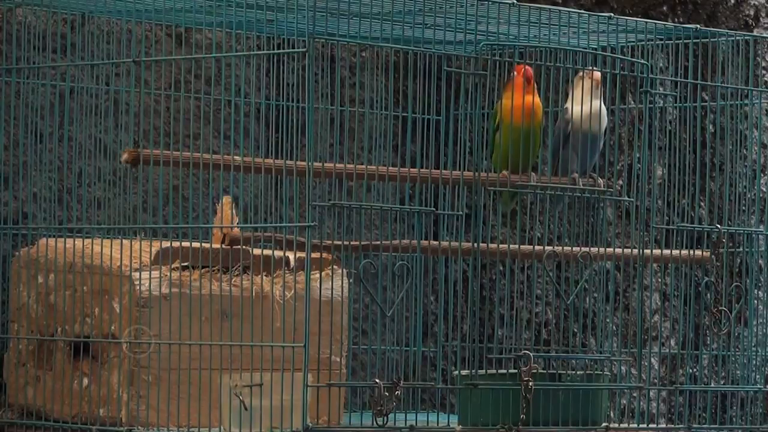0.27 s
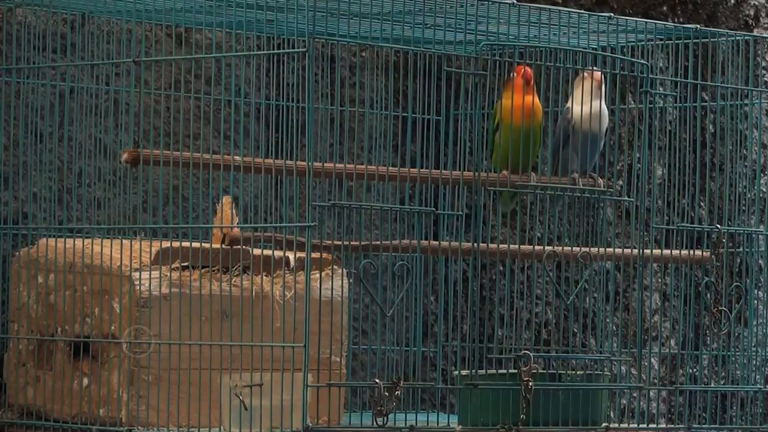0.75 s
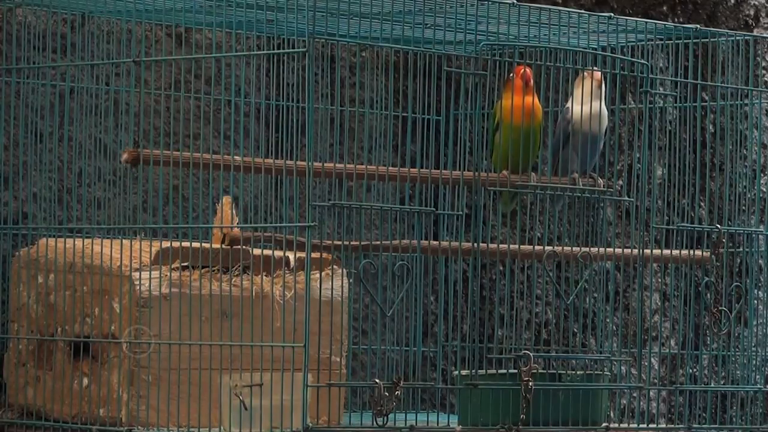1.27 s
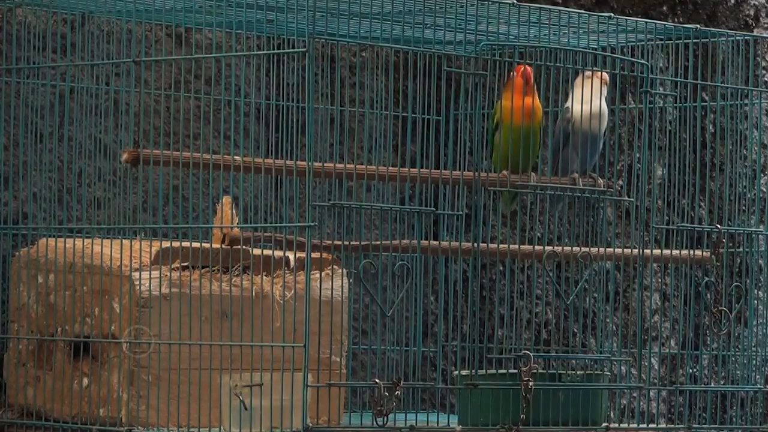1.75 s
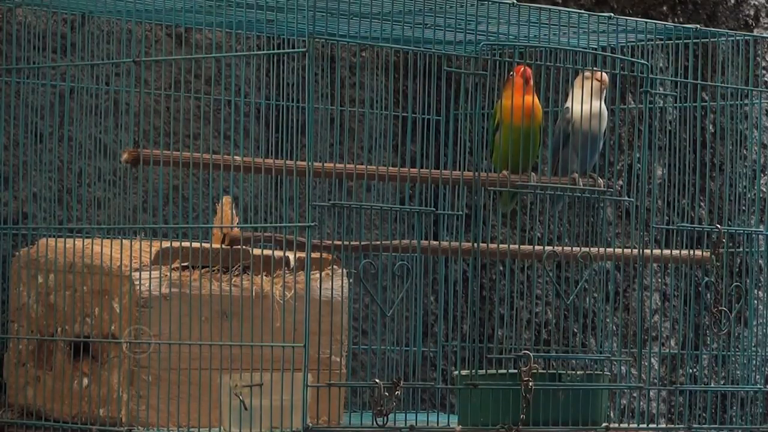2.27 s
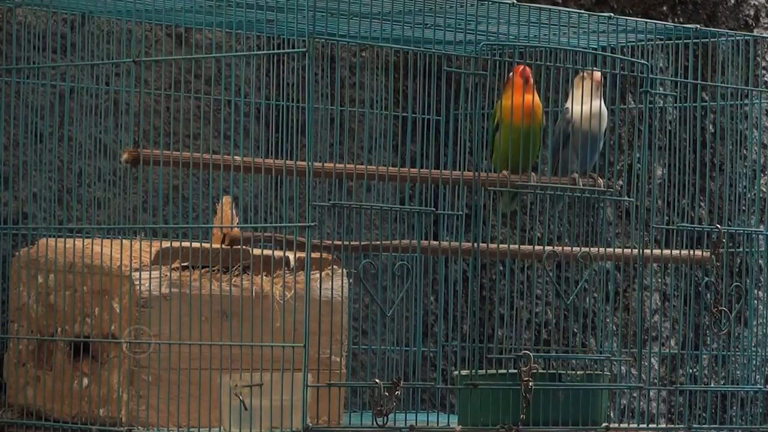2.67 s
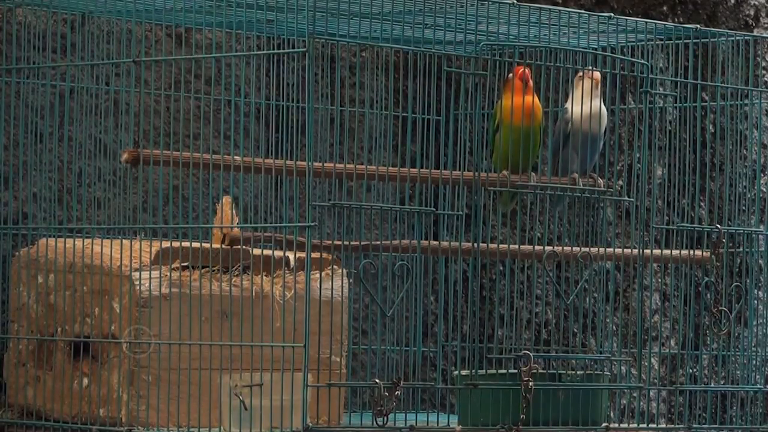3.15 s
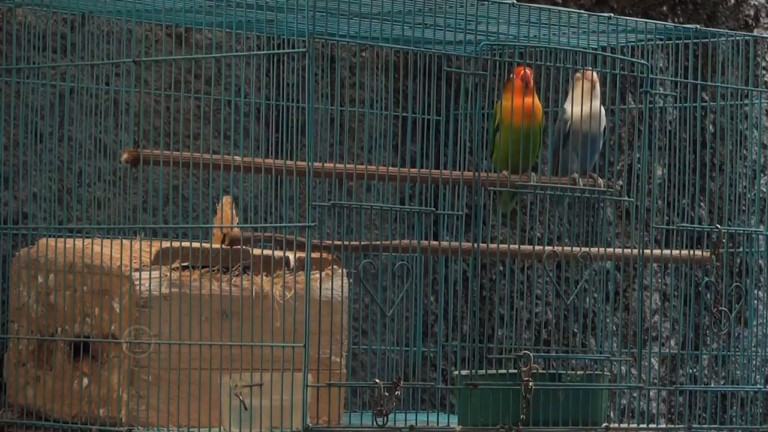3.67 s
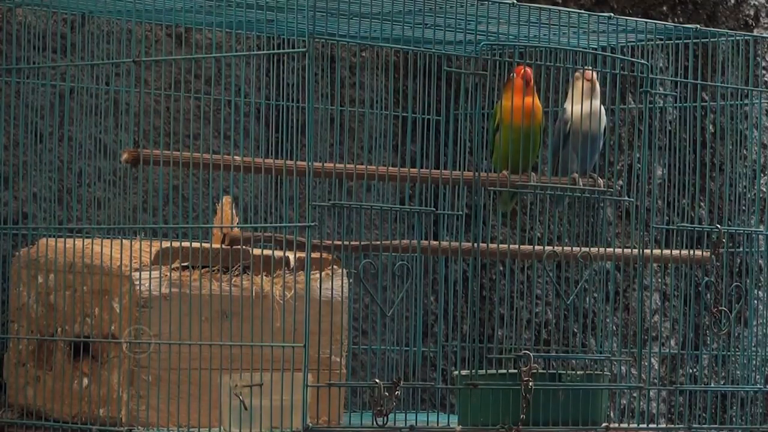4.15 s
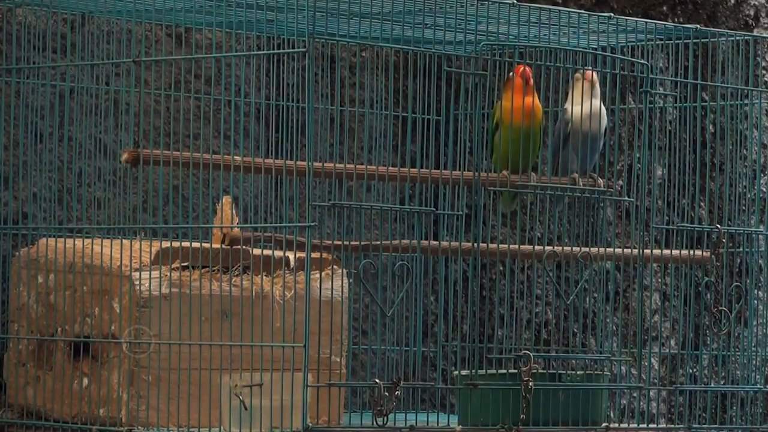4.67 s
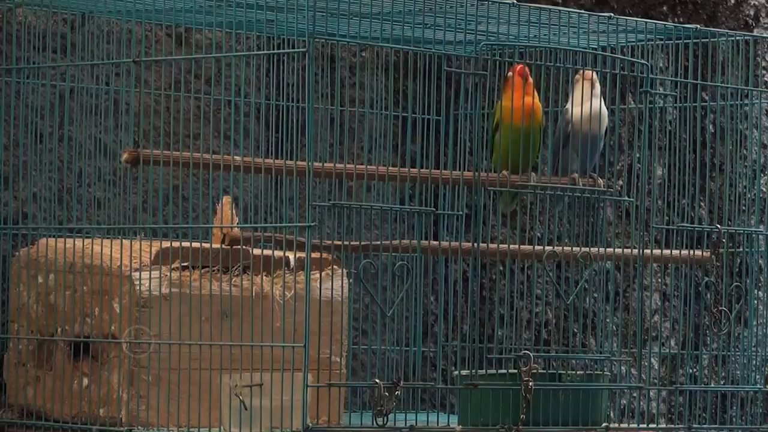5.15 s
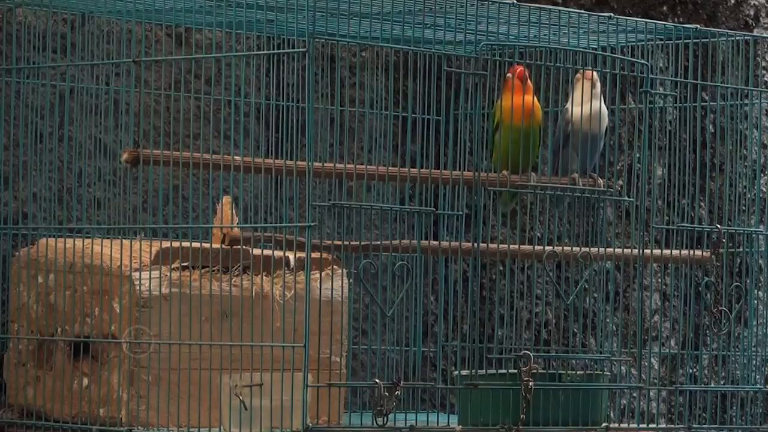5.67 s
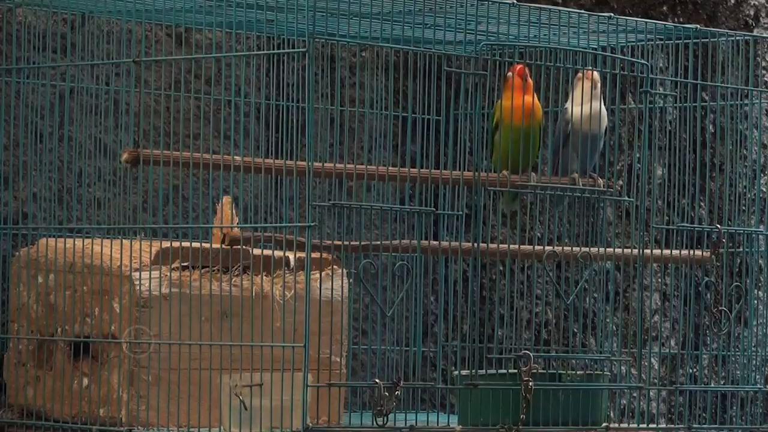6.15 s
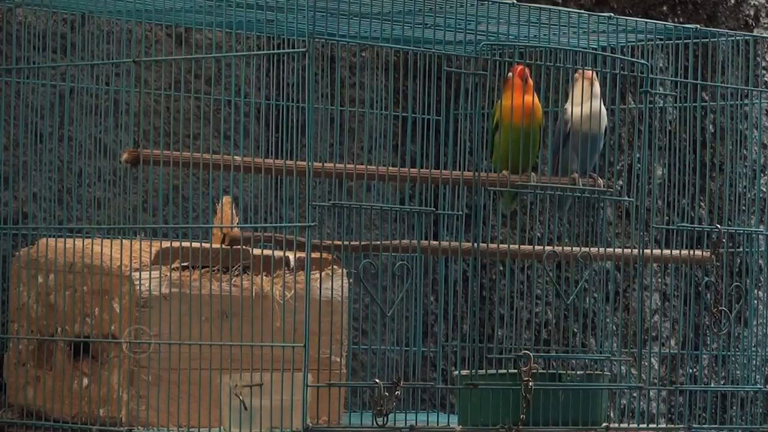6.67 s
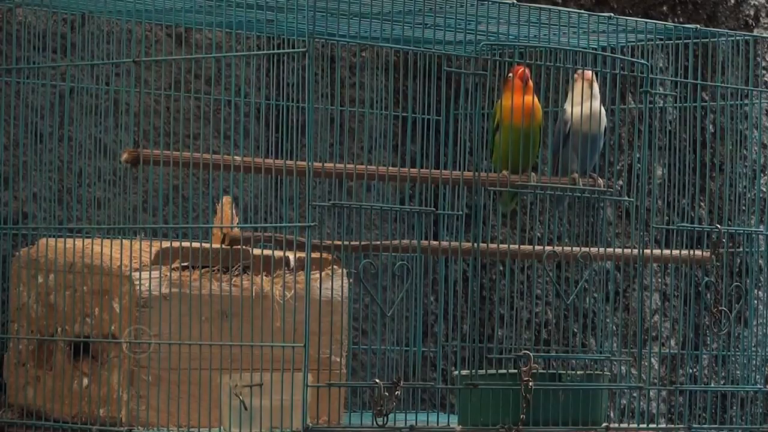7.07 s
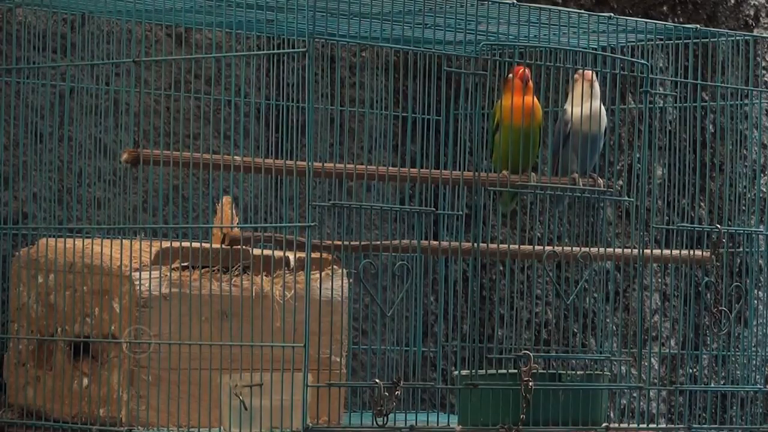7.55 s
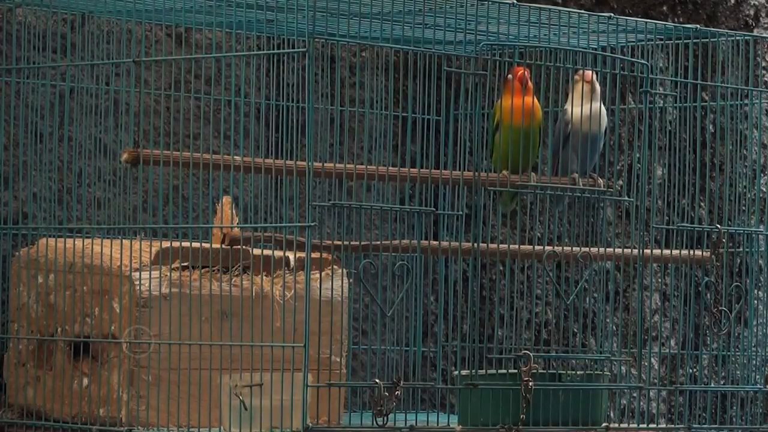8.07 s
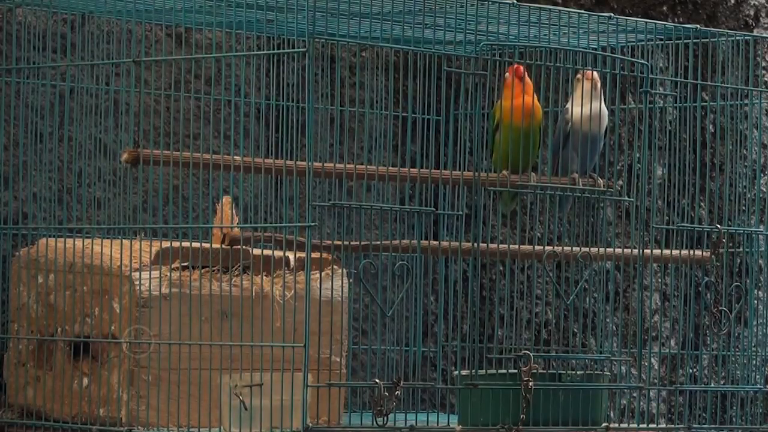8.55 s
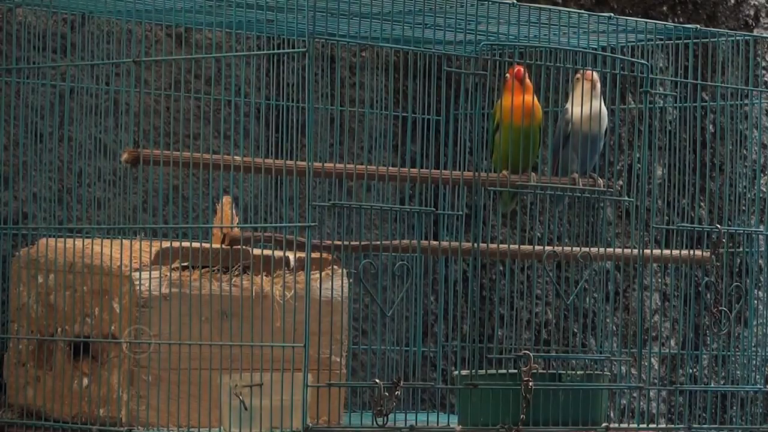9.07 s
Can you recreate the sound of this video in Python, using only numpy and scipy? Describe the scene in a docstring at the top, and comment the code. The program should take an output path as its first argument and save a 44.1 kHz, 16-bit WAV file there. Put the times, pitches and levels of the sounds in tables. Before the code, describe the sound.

Two caged lovebirds chatter in sharp, high, rapid chirp clusters with short pauses, ringing off hard walls over a faint low distant rumble.

```python
"""In a hard-walled room, two caged lovebirds chatter.
Each chirp chains quick syllables: whistled glides, nasal low notes and rasps, built from overtones
that sweep through the resonances of throat and beak, then ring on between the walls.
A distant outdoor rumble, made of shaped noise, lies underneath.
An automatic gain control ducks under the loudest shrieks, and the highest treble is cut off."""
import sys
import numpy as np
from scipy import signal
from scipy.fft import rfft, irfft, next_fast_len
from scipy.io import wavfile
from scipy.ndimage import uniform_filter1d, minimum_filter1d, map_coordinates

SR = 44100
rng = np.random.default_rng(int(sys.argv[2]) if len(sys.argv) > 2 else 0)


def bounce(signal):
    """Save signal as a 16-bit WAV file at the path given by the first command-line argument."""
    frames = np.transpose(np.atleast_2d(signal))
    limited = np.clip(frames, -1, 1)
    pcm = np.round(limited * 32767).astype(np.int16)
    wavfile.write(sys.argv[1], SR, pcm)


N = 411012  # length of the scene in samples

RELEASE_S = 0.00418  # every note fades out over this time


def amp(db):
    """Turn decibels into a gain."""
    return 10 ** (np.asarray(db) / 20)


def unit(x):
    """Scale x to an average strength (rms) of 1."""
    return x / np.sqrt(np.mean(x ** 2) + 1e-20)


def along(points, hz):
    """Read a curve of (f/Hz, value) points at hz, on a logarithmic frequency axis."""
    f, v = np.transpose(points)
    return np.interp(np.log(hz + 1), np.log(f + 1), v)


def over_time(points, t):
    """Read a curve of (position, value) points at t, in straight lines."""
    return np.interp(t, *np.transpose(points))


def wobble(t, rate):
    """Draw a smooth random curve over the times t, with rate random points a second."""
    return map_coordinates(rng.standard_normal(size=512), [t * rate], mode="wrap")


def filtered(x, response):
    """Make each frequency of x louder or softer by the gain response(hz)."""
    n = x.shape[-1]
    m = next_fast_len(n + 8192)  # silence at the end keeps it from wrapping round
    spectrum = rfft(x, m) * response(np.fft.rfftfreq(m, 1 / SR))
    return irfft(spectrum, m)[..., :n]


def clock(length):
    """Count the time within a note, its release included."""
    return np.arange(int((max(length, .004) + RELEASE_S) * SR)) / SR


def lovebirds():
    """Add up both birds' syllables, each at its moment."""
    song = np.zeros(N + SR)
    for start, note in (*peeps(), *nasals(), *chips(), *tweets(), *slurs(), *squawk()):
        song[max(round(start * SR), 0):][:len(note)] += note
    return song[:N]


def tweets():
    """Whistles that scoop up to their pitch from below and keep climbing."""
    # Upward whistles: [t/s, length/s, pitch/Hz, scoop/octaves, level/dB,
    # overtone slope/dB per octave, roughness/0-1]
    tweet_notes = [ (1.235, 0.033, 3600, .2, -19.5, -6.5, 0.39), (1.923, 0.037, 3174, 0.35, -13, -5, 0.18),
                   (2.776, 0.026, 4470, 0.23, -16.5, -5, .22), (2.897, 0.04, 3697, 0.08, -11.5, -3, 0.31),
                   (2.929, 0.052, 4300, 0.053, -14.5, -7, 0.12), (3.604, 0.041, 4650, 0, -24.5, -2, .03),
                   (4.741, .03, 4080, 0.08, -16, -8, 0.34), (4.934, 0.046, 4104, 0.16, -10.5, -7.5, 0.26),
                   (5.072, 0.036, 5110, 0.024, -18.5, -3.5, 0.03),
                   (5.245, 0.019, 5100, 0.59, -9.5, -4, 0.56), (5.754, 0.04, 4250, 0.19, -15.5, -1.5, 0.19),
                   (6.089, .041, 4250, 0.59, -16.5, 0, 0), (6.257, 0.076, 4205, .15, -16, 0, 0.14),
                   (6.463, .036, 4250, 0.51, -17.5, 0.5, 0.05), (6.662, 0.052, 4420, 0.72, -15.5, 1, 0.08),
                   (6.908, 0.037, 4560, 0.11, -14.5, 1.5, 0.28), (6.946, 0.026, 6390, 0.69, -14.5, -4, .25),
                   (8.529, 0.034, 3224, .05, -10, -7, 0.59), (9.304, .014, 4050, 0.46, -14.5, -2, 0.3), ]
    scoop_s, climb_oct_per_s = .007, 2.52
    for start, length, hz, scoop, db, slope_db, rough in tweet_notes:
        note = whistle(length, hz, -scoop, scoop_s, climb_oct_per_s, slope_db, rough)
        yield start, amp(db) * note


def slurs():
    """Whistles that slide in from above their pitch and sink."""
    # Downward whistles: [t/s, length/s, pitch/Hz, level/dB,
    # overtone slope/dB per octave, roughness/0-1]
    slur_notes = [ (0.531, 0.0216, 3860, -19.5, -1.5, 0.32), (0.646, 0.03, 3360, -24.5, -4.5, 0.57),
                  (1.195, 0.042, 3317, -17.5, -24, 0.42), (1.617, 0.012, 2784, -15, -22, 0.02),
                  (1.662, 0.024, 3540, -12, -3, 0.1), (1.69, 0.055, 4000, -17.5, -9.5, 0.13),
                  (1.962, 0.035, 3058, -15.5, -4.5, 0.37), (2.724, 0.036, 3134, -19, -24, 0.4),
                  (3.052, 0.028, 3846, -16, -3, 0.31), (3.414, 0.034, 3206, -23, -4.5, 0.4),
                  (3.554, 0.032, 3823, -19, -10, 0), (4.693, 0.043, 3160, -19.5, -6, 0.42),
                  (4.916, 0.015, 4420, -12, -21, 0.53), (5.05, 0.0094, 6040, -18, 1, 0.1),
                  (6.584, 0.024, 3670, -16, -9, 0.67), (6.889, 0.017, 6040, -23.5, -10, 0.1),
                  (7.733, 0.022, 3680, -16, -16, 0), (8.559, 0.0417, 3255, -15.5, -4.5, 0.23), ]
    slide_oct, slide_s, sink_oct_per_s = 0.192, 0.00496, 1.15
    for start, length, hz, db, slope_db, rough in slur_notes:
        note = whistle(length, hz, slide_oct, slide_s, -sink_oct_per_s, slope_db, rough)
        yield start, amp(db) * note


def whistle(length, hz, miss_oct, settle_s, drift_oct_per_s, slope_db, rough):
    """The pitch starts off its mark, settles quickly and drifts steadily."""
    off_pitch_db_per_oct = -12.5  # a whistle is weak until it finds its pitch
    t = clock(length)
    miss = miss_oct * np.exp(-t / settle_s)
    pitch = hz * 2 ** (miss + drift_oct_per_s * (t - length / 2))
    strength = amp(off_pitch_db_per_oct * np.abs(miss))
    return strength * syllable(t, pitch, slope_db, rough)


def chips():
    """The voice leaps out of a low grunt to a peak, then falls ever faster, growing rough and faint."""
    # Chips, timed by their leap: [t/s, grunt/s, tumble/s, low pitch/Hz, peak pitch/Hz, level/dB]
    chip_notes = [ (.102, 0.00041, 0, 2000, 2760, -18), (.289, 0, 0.019, 2640, 3560, -23.5),
                  (1.185, .009, 0.0075, 2096, 4130, -18.5), (1.245, 0, 0.012, 3410, 4220, -21.5),
                  (1.904, 0.0038, 0.0095, 2840, 3810, -15), (2.673, .005, 0.049, 2575, 4996, -15.5),
                  (2.871, 0, 0, 2360, 3400, -12.5), (3.04, 0.0016, 0, 1800, 2500, -23),
                  (3.088, 0.0094, 0.015, 3056, 4645, -15.5), (3.58, 0.0026, 0.04, 2796, 4470, -14),
                  (4.031, 0, .024, 4280, 4800, -16), (4.69, 0.002, 0.011, 2950, 4300, -19),
                  (4.813, 0.00097, 0.0098, 3380, 4570, -15), (5.056, 0, .016, 2904, 5120, -15),
                  (5.197, 0, 0, 3440, 4890, -12.5), (5.449, .01, 0.034, 2165, 4970, -15),
                  (5.608, 0.015, 0.054, 1862, 4130, -17), (5.752, .006, 0.0013, 2200, 3750, -21.5),
                  (6.221, 0.0027, .014, 2430, 6040, -15), (6.562, 0.0023, 0.0072, 1954, 4720, -15.5),
                  (6.705, 0, 0.029, 4220, 4510, -21), (6.732, 0.0044, 0.0026, 2570, 3390, -14),
                  (7.702, 0.0078, 0.028, 2382, 4494, -21), (7.748, 0, 0.026, 3506, 4270, -21.5),
                  (8.43, 0.0041, .016, 2840, 4900, -11), ]
    grunt_db, leap_s = -5.5, .008
    tumble_oct, tumble_curve, tumble_db = 1.1, 2.6, -8
    # Tone at the low start, the peak and the end of the tumble.
    stage_rough = [0.41, 0.423, 0.94]  # 0-1
    stage_slope = [-2.5, -2, -6.5]  # dB per octave
    for leap, grunt, tumble, low_hz, peak_hz, db in chip_notes:
        t = clock(grunt + leap_s + tumble)
        up = np.clip((t - grunt) / leap_s, 0, 1)
        down = np.clip((t - grunt - leap_s) / (tumble + RELEASE_S), 0, 1) ** tumble_curve
        pitch = low_hz * (peak_hz / low_hz) ** up * 2 ** (-tumble_oct * down)
        slope_db = np.interp(up + down, np.arange(3), stage_slope)
        rough = np.interp(up + down, np.arange(3), stage_rough)
        level_db = db + grunt_db * (t < grunt) + tumble_db * down
        yield leap - grunt, amp(level_db) * syllable(t, pitch, slope_db, rough)


def nasals():
    """An even glide in the low register, rich in overtones and mostly brighter when louder."""
    # Nasal notes: [t/s, length/s, middle pitch/Hz, glide/octaves, level/dB, roughness/0-1]
    nasal_notes = [ (0.519, 0.031, 2063, -0.59, -23, 0.48), (1.195, 0.027, 1982, -.45, -24, 0.52),
                   (1.596, 0.024, 2850, 0.034, -27, 0.2), (1.626, 0.031, 2706, 0.22, -18.5, 0.77),
                   (1.768, 0.022, 2293, -0.1, -17.5, 0.21), (1.796, 0.046, 2566, 0.068, -16.5, 0.24),
                   (2.842, 0.039, 2727, 0.31, -19, 0.33), (3.099, 0.022, 3055, -0.095, -23, 0.2),
                   (3.324, 0.01, 2190, 0.055, -20, 0.26), (3.351, .033, 2303, -.28, -18, 0.4),
                   (3.529, .015, 1920, -0.52, -24, .2), (3.545, 0.026, 2370, -0.31, -17.5, 0.26),
                   (3.973, 0.0047, 1667, -0.078, -23.5, 0.28), (3.977, 0.033, 2173, 0.12, -19, 0.15),
                   (4.013, 0.0237, 2566, 0.27, -15, 0.3), (4.677, 0.015, 2530, .05, -21, .07),
                   (4.821, 0.079, 2754, 0.32, -10, 0.33), (5.027, 0.017, 2414, 0.44, -22.5, 0.54),
                   (5.167, 0.029, 1970, 0.21, -20.5, 0.1), (6.689, .015, 1780, -0.15, -21.5, .2),
                   (6.872, 0.011, 1865, -0.36, -23.5, 0.42), (7.69, 0.022, 2900, -.75, -24, 0.14),
                   (7.766, 0.0081, 1944, -0.19, -19, 0), (9.297, 0.015, 2740, 0.038, -24, 0.1), ]
    # How brightness follows loudness: [level/dB, overtone slope/dB per octave]
    brightness = [(-32.5, 3.5), (-25.5, -5), (0, 6)]
    for start, length, hz, glide, db, rough in nasal_notes:
        t = clock(length)
        pitch = hz * 2 ** (glide * (t / t[-1] - .5))
        yield start, amp(db) * syllable(t, pitch, over_time(brightness, db), rough)


def squawk():
    """One long harsh call: the two sides of the syrinx (the bird's voice organ) sound at odds."""
    # Course of the call: [t/s, main pitch/Hz, second pitch/Hz, main level/dB,
    # second level/dB, roughness/0-1]
    call_course = [ (8.261, 1575, 1708, -25, -47, 0.01), (8.276, 1821, 1763, -22.5, -20, 0.28),
                   (8.31, 1813, 1773, -19, -28, 0.31), (8.325, 2140, 1800, -19, -30, 0),
                   (8.37, 1962, 2276, -19.5, -21.5, 0.1), (8.42, 1991, 2414, -15.5, -23, 0.26),
                   (8.46, 2070, 2840, -22, -16.5, 0.72), (8.522, 2117, 2670, -22, -35, 0.57),
                   (8.585, 2003, 2780, -12, -31, 0.32), ]
    slope_db = -1  # overtones, per octave
    times, *columns = np.transpose(call_course)
    t = clock(times[-1] - times[0])
    curves = [np.interp(times[0] + t, times, c) for c in columns]
    main_hz, second_hz, main_db, second_db, rough = curves
    for pitch, db in ((main_hz, main_db), (second_hz, second_db)):
        yield times[0], amp(db) * syllable(t, pitch, slope_db, rough)


def peeps():
    """Soft contact notes whose pitch sags at a steady rate."""
    # Contact notes: [t/s, length/s, middle pitch/Hz, level/dB]
    peep_notes = [(0, 0.038, 1520, -35.5), (0.139, 0.049, 1593, -30.5), (0.73, 0.02, 1570, -34),
                  (0.832, 0.024, 1457, -29), (1.039, 0.021, 1380, -35.5), (1.118, 0.0087, 1430, -32.5),
                  (7.559, 0.0081, 1732, -28.5)]
    sag_oct_per_s, slope_db, rough = 4.1, -6.5, 0.15
    for start, length, hz, db in peep_notes:
        t = clock(length)
        pitch = hz * 2 ** (-sag_oct_per_s * (t - length / 2))
        yield start, amp(db) * syllable(t, pitch, slope_db, rough)


def syllable(t, pitch, slope_db, rough):
    """One glide of the syrinx; when it runs rough, pitch and strength shake from moment to moment."""
    # Resonances of throat and beak: [f/Hz, gain/dB]
    throat = [(1200, -14), (1800, 4), (2400, 3.5), (4000, 4), (5500, 2), (6700, -2), (8200, -1),
              (10000, -7), (12500, -13.5), (15500, -31.5)]
    jitter, waver = 0.0948, 0.01236  # pitch shake, as a natural logarithm
    flutter_db, tremble_db = 5, 2.9
    rasp = 0.39  # phase shake in radians
    swell_db, swell_s, attack_s = 4, 0.0022, 0.00056

    rough = np.clip(rough, 0, 1)
    shake = rough * jitter * wobble(t, 1200) + waver * wobble(t, 202.3)
    pitch = np.abs(pitch) * np.exp(shake)
    phase = 2 * np.pi * np.cumsum(pitch) / SR
    k = np.arange(1, 11)[:, None]  # the fundamental and nine overtones
    # Overtones sweep through the fixed resonances; those too high for the sample rate are left out.
    gain_db = slope_db * np.log2(k) + along(throat, k * pitch)
    gains = amp(gain_db) * (k * pitch < SR / 2)
    # Uneven cycles smear each overtone, the higher ones most.
    smear = rasp * rough * np.sqrt(k) * np.array([wobble(t, 1500) for _ in k])
    tone = np.sum(gains * np.sin(k * phase + smear), axis=0)
    flutter = rough * flutter_db * np.tanh(wobble(t, 500))
    tone = tone * amp(flutter + tremble_db * wobble(t, 129.6))
    pressure = amp(-swell_db * np.exp(-t / swell_s))  # the air pressure takes a moment to build
    fade_in = np.clip(t / attack_s, 0, 1)
    fade_out = np.clip((t[-1] - t) / RELEASE_S, 0, 1)
    return unit(tone * pressure) * fade_in * fade_out


def room(x):
    """Close surfaces answer at once, the far wall a little later, and a diffuse tail dies away."""
    # How long the walls ring: [f/Hz, time to fall by 60 dB/s]
    ring_time = [(1500, 0.54), (4000, 0.57), (8000, 0.43), (14000, 0.33)]
    build_s = 0.0076
    echoes = ((.005, -8), (.029, -9))  # near and far: (delay in s, level in dB)
    # The tail is noise that fades at its own pace in each frequency band.
    hz, t, bands = signal.stft(rng.standard_normal((2, SR * 3 // 4)), SR, nperseg=256)
    decay = amp(-60 * t / along(ring_time, hz)[:, None])
    tail = signal.istft(bands * decay, SR, nperseg=256)[1]
    t = np.arange(tail.shape[1]) / SR
    tail = tail * (1 - np.exp(-t / build_s))
    answer = tail / np.linalg.norm(tail[0])
    for delay, db in echoes:
        # Six arrivals in each channel, scattered by up to 4 ms.
        arrivals = np.abs(delay + .004 * rng.uniform(-1, 1, size=(2, 6)))
        for channel, times in zip(answer, arrivals):
            channel[(times * SR).astype(int)] += amp(db) / np.sqrt(len(times))
    return signal.fftconvolve(x[None], spread(answer), axes=1)[:, :N]


def spread(pair):
    """Turn two unrelated signals into a diffuse field, as closely spaced microphones pick it up."""
    # Stereo width: [f/Hz, side level minus middle level/dB]
    width = [(100, -49), (350, -31), (700, -14.5), (3000, -11), (6000, -11.5), (10000, -21), (14000, -59)]
    side = filtered(pair[1], lambda hz: amp(along(width, hz)))
    return np.array([pair[0] + side, pair[0] - side])


def rumble():
    """A far-off outdoor roar: shaped noise that swells and recedes."""
    # Colour of the roar: [f/Hz, relative level/dB]
    roar_colour = [(20, -18), (40, -15.5), (78, 0.5), (100, -2), (155, 1.5), (200, -8), (320, 1.5),
                   (440, -1), (560, -5), (680, -2.5), (900, -7), (1900, -7.5), (3200, -17.5), (6200, -27.5),
                   (15500, -39)]
    # Loudness of the roar: [t/s, level/dB]
    roar_level = [(0, -35.5), (1.2, -35.5), (2.2, -36), (2.6, -31.5), (3.2, -30.5), (3.7, -36.5),
                  (4.5, -35.5), (5.3, -37.5), (6.0, -37), (6.9, -36), (7.4, -38.5), (8.2, -39), (8.9, -39),
                  (9.3, -39)]
    noise = filtered(rng.standard_normal((2, N)), lambda hz: amp(along(roar_colour, hz)))
    return unit(spread(noise)) * amp(over_time(roar_level, np.arange(N) / SR))


def scene():
    """The birds sit almost straight ahead, a touch louder on the left, over the rumble."""
    birds = lovebirds()
    left_right = amp([[.15], [-.15]])
    return (birds + room(birds)) * left_right + rumble()


def gain_control(x):
    """The gain drops just before the short-term level passes a ceiling, holds, and comes back."""
    ceiling_db = -11.5
    sense_s, hold_s, ahead_s = 0.0063, 0.028, 0.0059
    power = uniform_filter1d(np.mean(x ** 2, axis=0), int(sense_s * SR))
    level = np.sqrt(np.abs(power) + 1e-12)
    gain = np.minimum(1, amp(ceiling_db) / level)
    n = int(hold_s * SR)
    held = minimum_filter1d(gain, n, origin=(n - 1) // 2)  # looks back, so each dip lasts
    return x * uniform_filter1d(held, int(2 * ahead_s * SR))


def record(dry):
    """The gain control rides the level, and nothing above the band limit is kept."""
    top_hz = 15750
    return filtered(gain_control(dry), lambda hz: hz < top_hz)


dry = scene()
out = record(dry)
bounce(out)
```